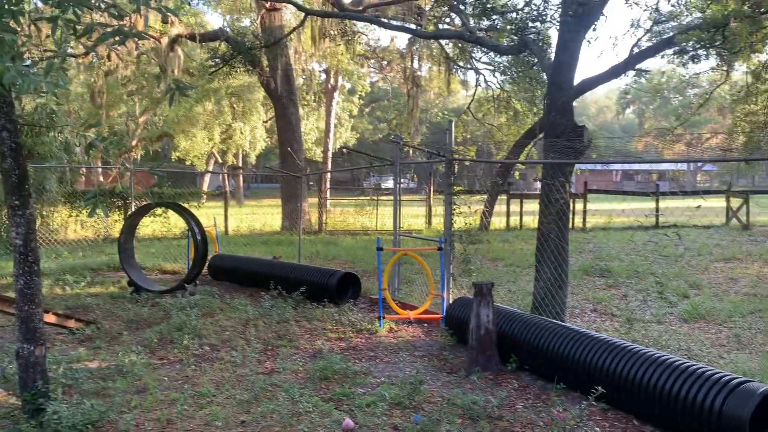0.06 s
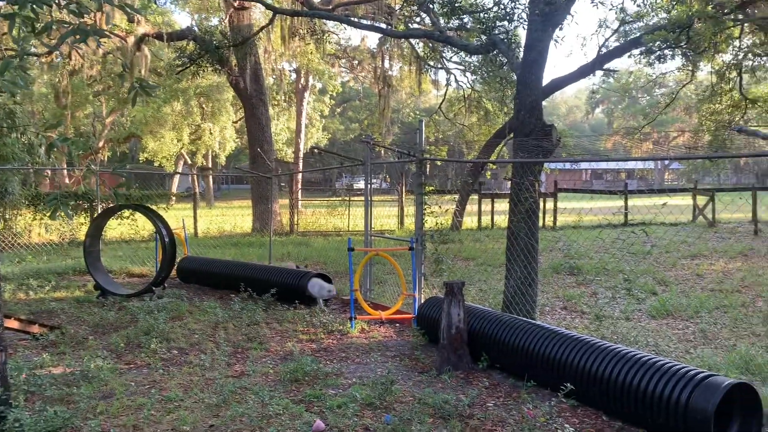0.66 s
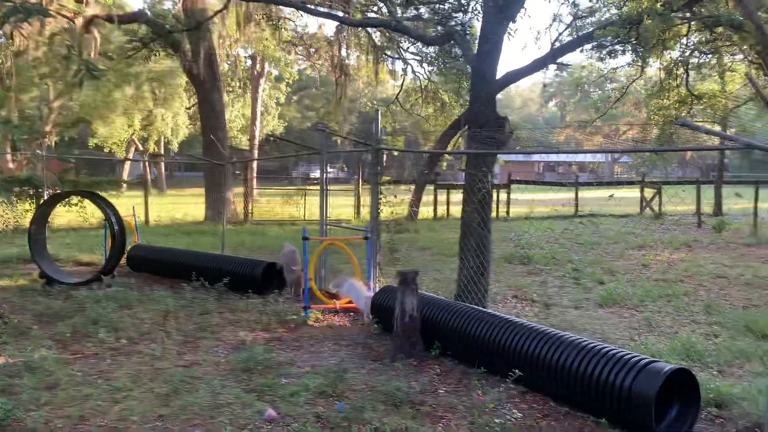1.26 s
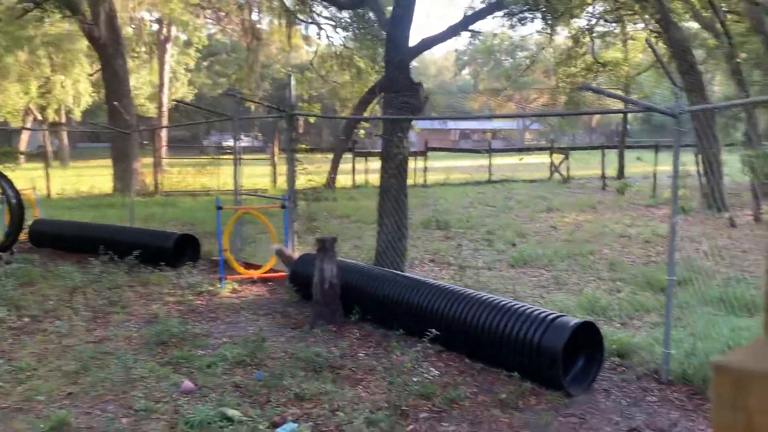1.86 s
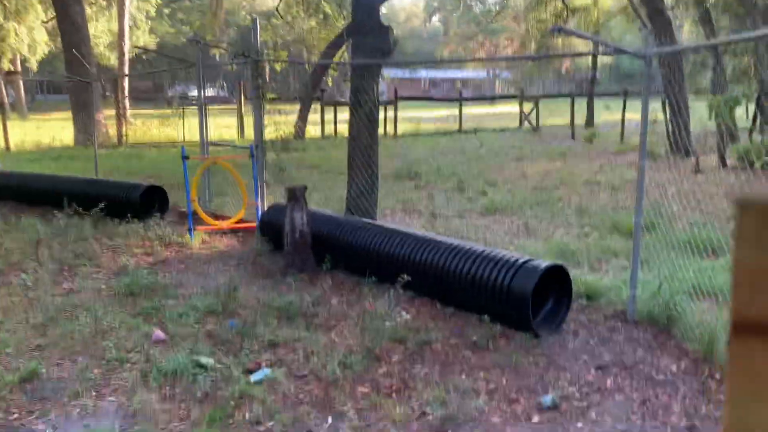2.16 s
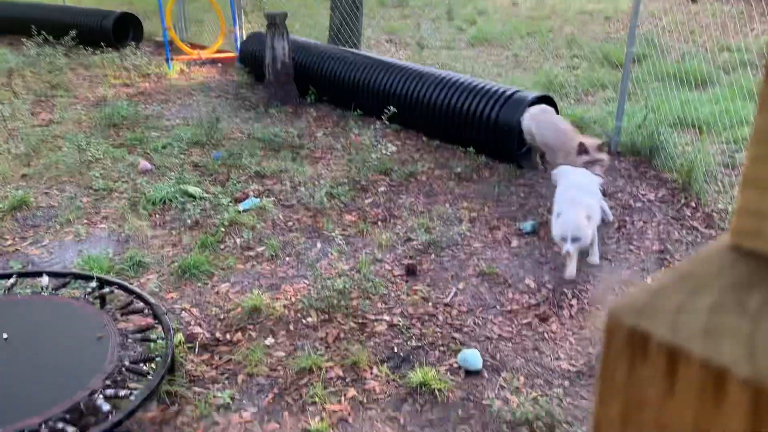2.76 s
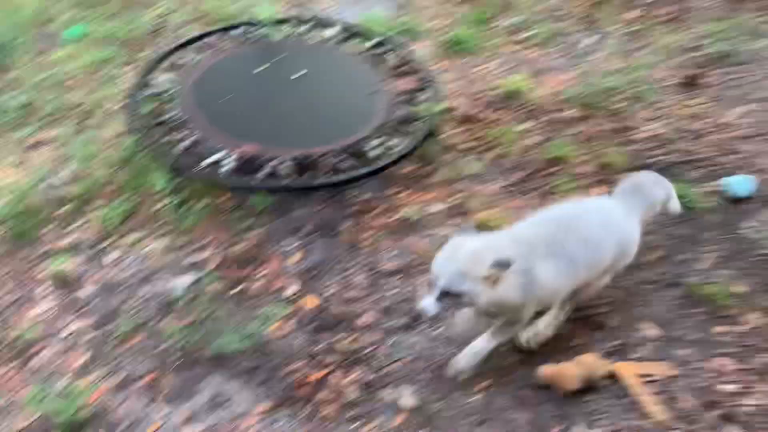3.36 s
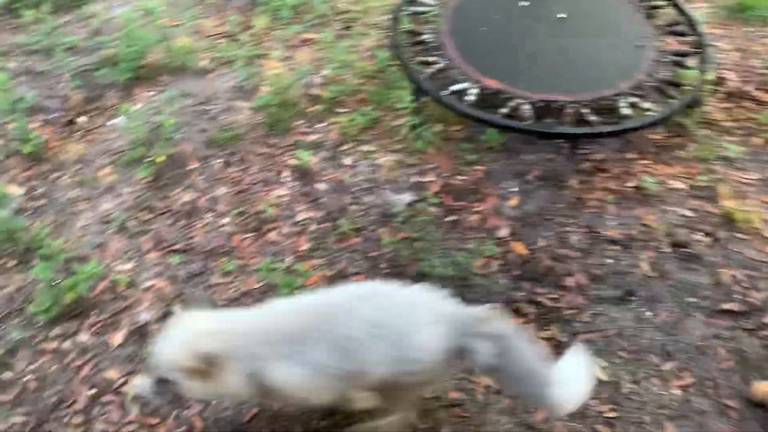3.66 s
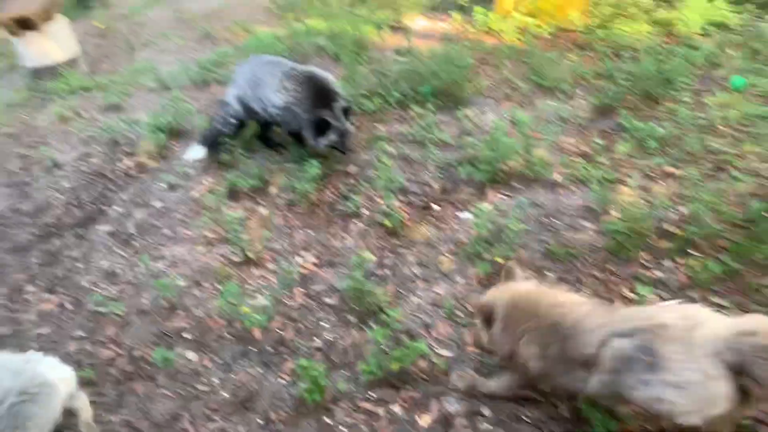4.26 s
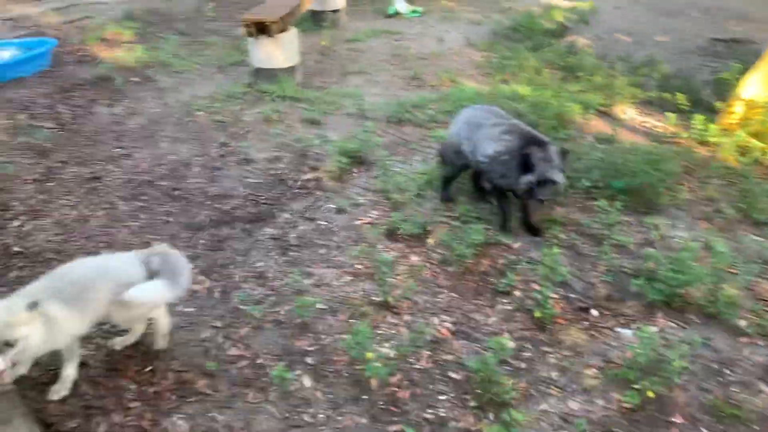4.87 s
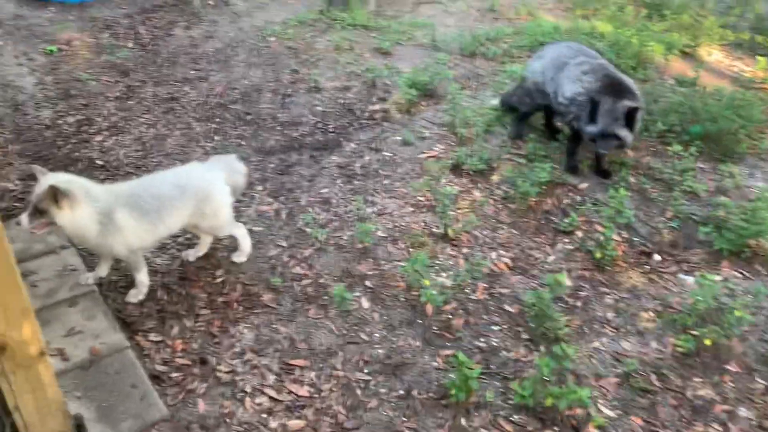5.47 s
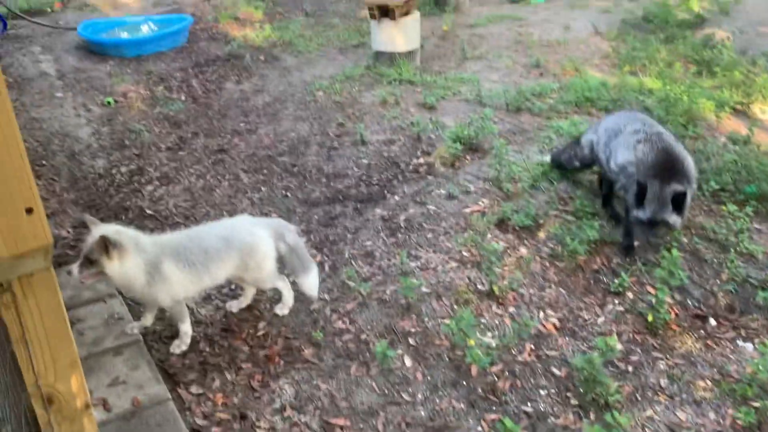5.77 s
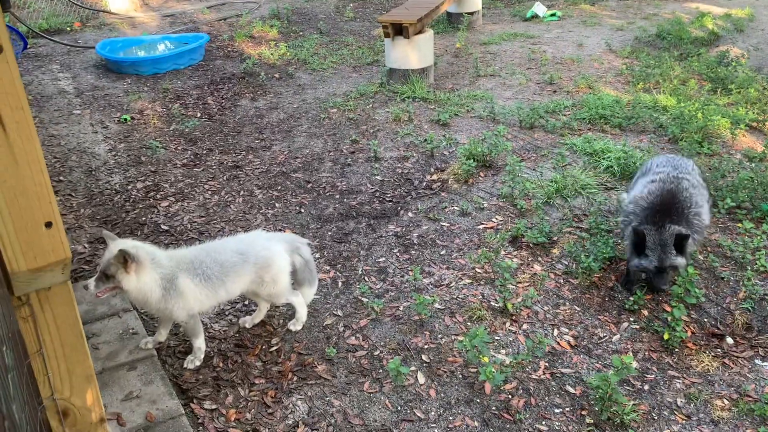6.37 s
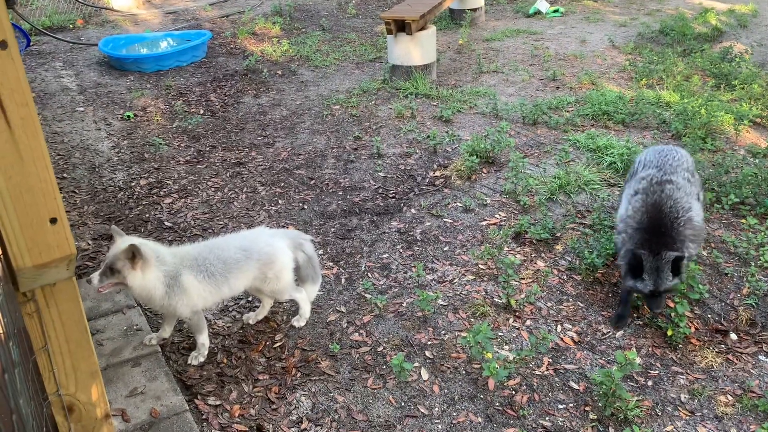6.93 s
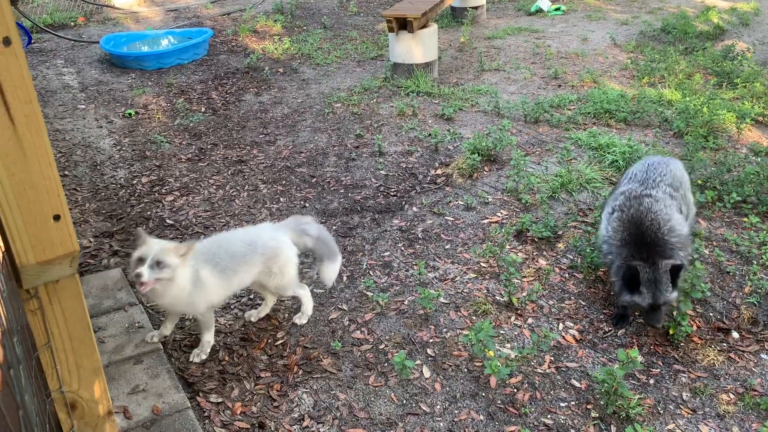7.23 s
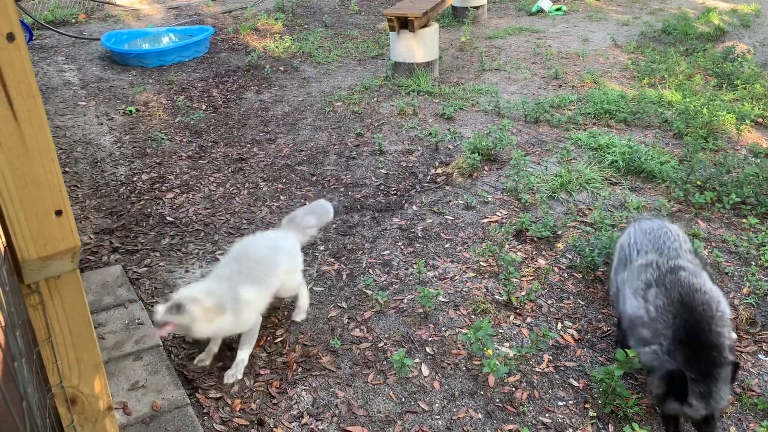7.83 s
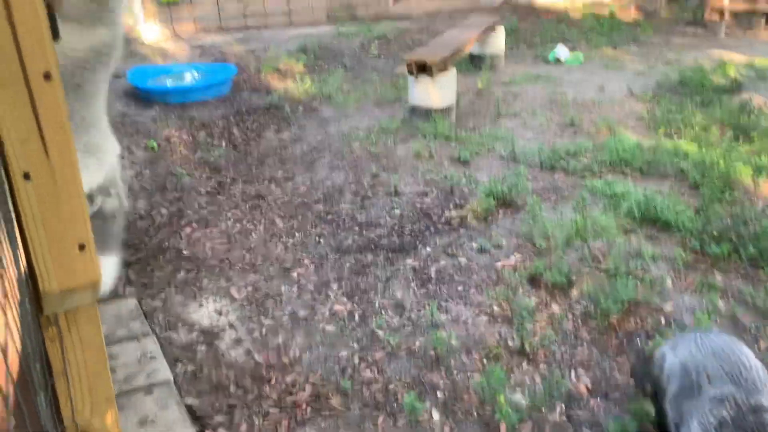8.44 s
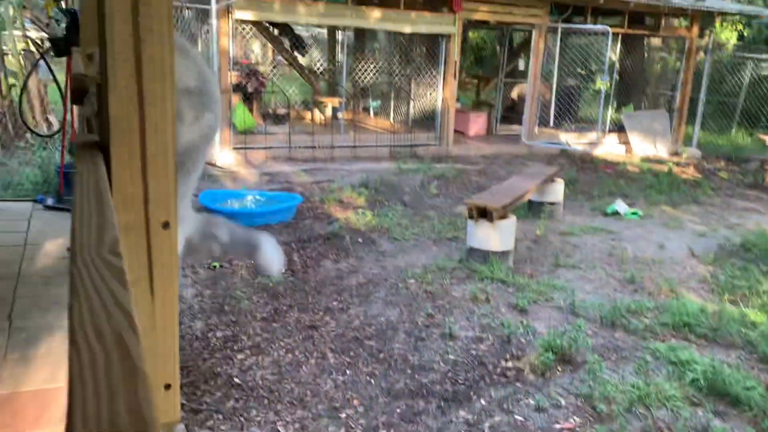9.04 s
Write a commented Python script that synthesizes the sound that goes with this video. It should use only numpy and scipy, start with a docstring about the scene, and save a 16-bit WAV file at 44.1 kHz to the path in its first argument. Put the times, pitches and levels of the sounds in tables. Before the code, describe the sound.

Foxes chatter in high chirps and whines while running closer through dry leaves, then one squeals loudly and scrambles onto a wooden deck.

```python
"""Over a low, distant rumble, two foxes run closer through a plastic pipe and dry leaves, chattering in
chirps and whines: vocal folds, clean or chaotic, driving throat resonances. A songbird repeats a phrase,
paws thud, some calls end in a huff, twigs snap. A fox yelps; a second bird whistles farther off.
One fox squeals loudly close by, then scrambles onto a wooden deck, whose boards ring.
Last, two hoarse calls come from the far pens."""
import sys
import numpy as np
from scipy import signal
from scipy.fft import rfft, irfft, next_fast_len
from scipy.io import wavfile
from scipy.ndimage import uniform_filter1d

SR = 44100
rng = np.random.default_rng(int(sys.argv[2]) if len(sys.argv) > 2 else 0)


def wav_record(signal):
    """Record a signal, one row per channel, as 16-bit PCM in the file named by sys.argv[1]."""
    frames = np.transpose(np.atleast_2d(signal))
    bounded = np.clip(frames, -1, 1)
    # unit amplitude maps onto the largest positive 16-bit level
    quanta = np.round(bounded * 32767).astype(np.int16)
    wavfile.write(sys.argv[1], SR, quanta)


N = 405719

# Table levels are relative. Echo decay: (frequency [Hz], T60 [s])
YARD_T60 = [(200, 0.99), (2200, 0.59), (14000, 0.036)]
# distant rumble: (frequency [Hz], level [dB])
RUMBLE_SPECTRUM = [(15, -57.5), (25, -18.5), (93, 0), (389, -27.5), (1570, -51), (2770, -47.5),
                   (15500, -72)]
# (time [s], level [dB])
RUMBLE_LEVEL = [(0, -45.5), (3, -45), (7.5, -52), (8.4, -45.5)]
# dry leaves: (frequency [Hz], level [dB])
LEAF_SPECTRUM = [(150, -10.5), (400, 4.5), (7000, -5), (15800, -7)]
# leaves underfoot: (time [s], level [dB])
RUNNING_LEVEL = [(0, -67.5), (2.2, -59.5), (3.8, -57.5), (4.3, -50), (4.8, -57), (5.1, -75.5), (6.3, -84),
                 (8.5, -67)]
# lower throat resonance: (frequency [Hz], level [dB])
THROAT_SPECTRUM = [(250, -39), (480, -20), (800, -1.5), (1100, 2.5), (1500, 5.5), (2300, -38.5)]
# shrill edge of near calls: (frequency [Hz], level [dB])
EDGE_SPECTRUM = [(2900, -25.5), (3700, -1), (4900, 7.5), (6000, 2), (7700, 15), (13000, -3), (15800, -17.5)]
# Brightness: upper throat resonance re lower. Edge: re upper. Push: place of peak effort in the call.
# chirps, barks: (time [s], length [s], first pitch [Hz], last pitch [Hz], settling [s], push [0-1],
#   effort [dB], brightness [dB], edge [dB], roughness [0-1])
CHIRPS = [(0.054, 0.15, 1380, 977, 0.026, 0, -44, 7, -11, 0.22),
          (0.269, 0.086, 1405, 937, 0.059, 0.21, -49.5, 10, -17, 0.63),
          (0.478, 0.12, 1023, 878, 0.048, 0.48, -50.5, 13, -13.5, 0.11),
          (1.273, 0.094, 827, 938, 0.011, 0.15, -46.5, 8, -11, 0.22),
          (1.44, 0.14, 1038, 917, 0.23, 0.11, -53, 19, -6, 0.03),
          (1.574, 0.13, 946, 915, 0.076, 0.12, -55, 21, -7, 0),
          (1.764, 0.15, 1375, 941, 0.043, 0.1, -46, 12, -15.5, 0.23),
          (2.003, 0.23, 1467, 1043, 0.04, 0, -40, 9.5, -10.5, 0.14),
          (2.302, 0.1, 1410, 1024, 0.042, 0.12, -43.5, 11.5, -13, 0.33),
          (2.494, 0.15, 1238, 1035, 0.041, 0.04, -37, 4, -2.5, 0.24),
          (2.709, 0.13, 1346, 971, .04, 0.08, -37.5, 5, -7.5, 0.35),
          (2.916, 0.12, 1227, 1008, 0.22, 0.36, -29.5, 5, -11, 0.15),
          (3.109, 0.077, 1378, 1299, 0.046, 0.62, -27, -8, -8, 0.43),
          (3.298, 0.13, 1080, 861, 0.038, 0.77, -33.5, 3, -7.5, 0.17),
          (3.559, 0.072, 1150, 819, 0.19, 0.29, -30.5, -5, -13, 0.82),
          (3.757, 0.081, 482, 693, 0.021, 0.69, -40.5, -0.5, -7.5, 0.42),
          (4.336, 0.13, 565, 703.7, 0.0089, 0.54, -33.5, -8.5, -9, 0.11),
          (4.929, 0.088, 827, 681, 0.05, 0.19, -45, 1.5, -9.5, 0.81)]
# foxes' position: (time [s], left port lead [ms], ground bounce delay [ms])
FOX_PATH = [(2.998, -0.21, 0.98), (3.9, 0.14, 0.93)]
# foxes' echo: (time [s], level [dB])
FOX_ECHO = [(2.2, -8), (3.1, -23.5), (4.7, -16.5)]
# songbird's phrase: (time from onset [s], pitch [Hz], level [dB])
PHRASE = [(0, 5270, -16), (.04, 4150, -3.5), (.075, 3312, -2), (.11, 3076, 10), (.14, 2600, 0),
          (.19, 2950, 2.5), (.22, 3650, 8), (0.279, 2478, 2.5), (.39, 2770, -2.5)]
# its repeats: (time [s], level [dB])
SONGS = [(0.371, -51), (3.059, -51.5), (6.878, -51.5)]
# paws on pipe and ground: (time [s], level [dB], ring [Hz])
PAW_THUDS = [(0.681, -35.5, 839), (2.128, -33, 270), (3.762, -34, 476), (4.348, -33.5, 275)]
# whines: (time [s], length [s], first pitch [Hz], top pitch [Hz], last pitch [Hz], place of top [0-1],
#   push [0-1], effort [dB], brightness [dB], edge [dB], roughness [0-1])
WHINES = [(0.817, 0.39, 865, 938.2, 900, .45, 0.73, -50, 10.4, -8, 0.021),
          (3.948, .265, 741, 1009, 888, 0.56, 0.85, -41, 4, -11, 0.17)]
# breath after calls: (time [s], level [dB])
HUFFS = [(1.183, -46), (1.678, -43.5), (3.015, -48), (3.41, -46.5), (4.733, -36.5)]
# twigs, leaves snapping: (time [s], level [dB])
SNAPS = [(2.0339, -18.5), (2.259, -25.5), (3.784, -27), (3.956, -32), (4.349, -32.5)]
# yelp: (time [s], pitch [Hz], effort [dB], brightness [dB], roughness [0-1])
YELP_CONTOUR = [(4.615, 493, -49.5, -2, 0.25), (4.648, 737, -50.5, 12.5, 0), (4.678, 1134, -38, 10.5, 0.02),
                (4.735, 966, -32, 6.5, 0.07), (4.75, 938, -30, -2, 0.12)]
# far bird: (time [s], length [s], pitch [Hz], level [dB])
WHISTLES = [(5.088, 0.12, 2740, -63.5), (5.756, 0.21, 2675, -64.5)]
# squeal: (time [s], pitch [Hz], effort [dB], brightness [dB], roughness [0-1])
SQUEAL_CONTOUR = [(7.333, 481.5, -49, -13.5, 0.94), (7.42, 918, -38, 2.5, 0.81),
                  (7.479, 1014, -37.5, 9.5, 0.09), (7.555, 1171, -33.5, 13, 0.08),
                  (7.598, 1169, -32.5, 20.5, 0.06), (7.632, 1172, -44, 27, 0.14),
                  (7.656, 1097, -35.5, 8.5, 0.04), (7.695, 1088, -32, 8.5, 0.01),
                  (7.757, 1078, -32, 3, 0.04), (7.783, 1041, -28, 5.5, 0), (7.817, 979, -26, -0.5, 0.02),
                  (7.831, 856.4, -30.5, 9, 0.14), (7.843, 963, -26.5, -1.5, 0.31)]
# its piercing edge: (frequency [Hz], level [dB])
SQUEAL_EDGE_SPECTRUM = [(3000, -36), (3500, 16), (4400, 9), (6500, -4.5), (7800, 5), (13000, -12),
                        (15800, -30.5)]
# scramble onto the deck: (time [s], length [s], level [dB])
SCUFFS = [(7.979, 0.62, -58.5), (8.425, 0.046, -45.5), (8.934, 0.098, -46)]
# brushed boards: (frequency [Hz], level [dB])
SCUFF_SPECTRUM = [(100, -28.5), (400, 1), (1900, -4.5), (12000, -29)]
# paws on the deck: (time [s], level [dB])
LANDINGS = [(8.35, -41.5), (8.693, -39), (8.76, -41.5), (8.962, -44)]
# ringing boards: (frequency [Hz], level [dB], T60 [s])
DECK_MODES = [(268, 5, 0.057), (497.4, -1.5, 0.19), (1081, -10, 0.32)]
# calls from the pens: (time [s], length [s], pitch [Hz], effort [dB], brightness [dB])
FAR_CALLS = [(8.502, 0.34, 497.4, -61.5, 21.5), (8.942, 0.24, 504.4, -65, 23)]
# their shrill edge: (frequency [Hz], level [dB])
FAR_EDGE_SPECTRUM = [(2600, -15), (3700, 14), (7200, -5), (15800, -46)]
# left microphone port re right: (frequency [Hz], phase [rad])
PORT_PHASE = [(4000, 0), (6500, .6), (9500, 3.1), (12200, 5.9), (14300, 6.5)]

CUTOFF_HZ, RING_HZ = 15850, 2642  # band limit; upper throat resonance of the chatter
FLUTTER_DB, SHIMMER_DB = 3.5, 2  # unsteadiness of level; of overtones
WAVER, WAVER_DB, WAVER_HZ = .01, 2.2, 28  # pitch share, brightness, top rate
DOUBLING, STRAIN_PER_DB = 3, .062  # sub-octave gain; breath share when overblown
HISS_HZ, EDGE_RASP = 5500, 1.5
HOLLOW_HZ, HOLLOW_WIDTH_HZ, HOLLOW_DB = 3970, 340, -6.5  # dip between throat and edge
SWELL_DB, FADE_DB = 14.5, 19.5  # effort slopes before and after the push, per call length
MOUTH_DB, MOUTH_LAG, TREBLE_HOLD = 3, .11, .45  # mouth is widest after the push; treble resists effort
PARTING_DB, PARTING_S = 9.5, .041  # treble held back until the jaws part
RELEASE_DB, RELEASE_S = 9.5, .013  # breath runs out
CLOSING_DB, SLUMP = 9.5, .06  # closing mouth: bass blooms, pitch drops by this share


def amp(db):
    """Decibels to gain."""
    return 10 ** (np.asarray(db) / 20)


def unit_rms(x):
    """Scales to rms 1."""
    return x / np.sqrt(np.mean(x ** 2) + 1e-20)


def steadied(x):
    """Holds the running rms near 1."""
    return x / np.sqrt(abs(uniform_filter1d(x ** 2, size=700)) + 1e-12)


def at_hz(points, hz):
    """Table lookup on a log-frequency axis."""
    f, value = np.transpose(points)
    return np.interp(np.log(hz + 1), np.log(f + 1), value)


def curve(points):
    """(time [s], value) at every sample."""
    return np.interp(np.arange(N) / SR, *np.transpose(points))


def shaped(x, gain):
    """Filters by gain(frequency)."""
    size = next_fast_len(x.shape[-1] + 1024)
    return irfft(rfft(x, size) * gain(np.fft.rfftfreq(size, 1 / SR)), size)[..., :x.shape[-1]]


def coloured(x, points):
    """Filters by (frequency [Hz], level [dB])."""
    return shaped(x, lambda f: amp(at_hz(points, f)))


def band_noise(count, centre_hz, half_width_hz):
    """Noise with one resonant peak."""
    return shaped(rng.standard_normal(count), lambda f: 1 / (1 + ((f - centre_hz) / half_width_hz) ** 2))


def wander(count, hz):
    """Random drift, rms 1, rolled off above hz."""
    return unit_rms(shaped(rng.standard_normal(count), lambda f: 1 / (1 + (f / hz) ** 4)))


def resonate(x, hz, width_hz):
    """Resonance tracking the curve hz."""
    phase = 2 * np.pi * np.cumsum(hz) / SR
    carrier = np.array([np.cos(phase), np.sin(phase)])
    return (carrier * shaped(carrier * x, lambda f: 1 / (1 + (2 * f / width_hz) ** 2))).sum(0)


def add(mix, start_s, sound):
    """Mixes sound in at start_s."""
    part = mix[..., max(round(start_s * SR), 0):][..., :sound.shape[-1]]
    part += sound[..., :part.shape[-1]]


def placed(x, lead_ms, ground_ms, shadow_db_per_ms=7, ground=.2, wall=1.0):
    """One port gets low partials earlier and louder; ground and wall bounces ripple the spectrum."""
    wall_s = .006 * rng.uniform(.6, 1.4, (2, 1))

    def ports(f):
        low = 1 / (1 + (f / 4500) ** 6)
        shadow = amp(shadow_db_per_ms * lead_ms * low / (1 + (f / 1800) ** 4))
        left = shadow * np.exp(1j * np.pi * f * low * lead_ms / 1000)
        off_ground = np.exp(-2j * np.pi * f * ground_ms / 1000)
        off_wall = np.exp(-2j * np.pi * f * wall_s)
        bounces = ground * off_ground + wall * (low * off_wall + (1 - low) * off_wall[0])
        return np.array([left, 1 / left]) * (1 + f / (f + 600) * bounces)
    return shaped(x, ports)


def yard_echo(x, early_db=6, early_s=.035):
    """Strong early scatter from deck and ground, then a thin tail from fences and trees."""
    t = np.arange(SR) / SR
    taps = rng.standard_normal((2, SR)) * (rng.random((2, SR)) < .08) * (t > .004)
    taps *= 1 + amp(early_db) * np.exp(-t / early_s)
    hz, frame_s, spectra = signal.stft(taps, SR, nperseg=256)
    decay = amp(-60 * frame_s / at_hz(YARD_T60, hz)[:, None])
    tail = signal.istft(spectra * decay, SR, nperseg=256)[1]
    return signal.fftconvolve(x[None], tail / np.linalg.norm(tail[0]), axes=1)[:, :N]


def rumble(gain_db=-2, spread_hz=600, hum_hz=88.4, hum_db=-54.5):
    """Distant rumble, near mono in the bass, with a wavering hum."""
    mid, side = rng.standard_normal((2, N))
    side = shaped(side, lambda f: .24 + .2 * f / (f + spread_hz) * f / (f + 150))
    noise = unit_rms(coloured(np.array([mid + side, mid - side]), RUMBLE_SPECTRUM))
    hum = np.sin(2 * np.pi * np.cumsum(hum_hz + 3 * wander(N, 6)) / SR) * amp(1.6 * wander(N, 4.5))
    return noise * amp(curve(RUMBLE_LEVEL) + gain_db) + amp(hum_db) * unit_rms(hum)


def leaves(clicks_per_s=1100, spread_db=3.5, clump_db=4.5, echo_db=-6):
    """Dry leaves crushed underfoot: tiny uneven crackles in random clumps."""
    crackle, t = np.zeros(N), np.arange(SR // 100) / SR
    for hz in np.geomspace(1500, 13000, num=5):
        hits = rng.random(N) < clicks_per_s / 5 / SR
        sizes = amp(spread_db * np.minimum(rng.exponential(1, N), np.pi))
        crush = band_noise(len(t), hz, hz / 2) * np.exp(-t / .0013)
        crackle += signal.oaconvolve(hits * sizes, crush)[:N]
    clumped = coloured(crackle, LEAF_SPECTRUM) * amp(clump_db * wander(N, 16))
    mono = unit_rms(clumped) * amp(curve(RUNNING_LEVEL))
    return mono + amp(echo_db) * yard_echo(mono)


def scamper(gain_db=-33, thud_hz=330, clump_db=4):
    """Soft patter of running feet."""
    patter = band_noise(N, thud_hz, half_width_hz=260) * amp(clump_db * wander(N, 25))
    return unit_rms(patter) * amp(curve(RUNNING_LEVEL) / 2 + gain_db)


def vocal_folds(phase, hz, rough, hoarse):
    """Overtones swell and fade singly; in a cracking voice, alternating cycles add a sub-octave."""
    tone = np.zeros(len(phase))
    for k in range(1, 19):
        shimmer = amp(SHIMMER_DB * (2 - 1 / k) * wander(len(phase), 41))
        tone += shimmer * np.cos(k * phase + rng.uniform(0, 2 * np.pi)) * (k * hz < CUTOFF_HZ)
    tone = unit_rms(tone)
    return unit_rms(tone + (rough * tone + DOUBLING * hoarse ** 4) * np.cos(phase / 2))


def fox_voice(contour, ring_hz, edge_db, edge_spectrum, catch, width_hz=1050, highpass_hz=1550, breath=0,
              release_share=.068, waver=WAVER, dull_db=6, jitter=.085, rasp=.55, strain_db=-19):
    """Vocal folds and breath drive two throat resonances and a shrill edge."""
    s, *columns = np.transpose(contour)
    rise_s, fall_s = .004, .012
    t = np.arange(s[0], s[-1] + fall_s, 1 / SR)
    hz, effort_db, bright_db, hoarse = (np.interp(t, s, c) for c in columns)
    # catch: extra roughness as the folds start and stop
    u = np.linspace(0, 1, len(t))
    starting, stopping = np.exp(-(u / .27) ** 4), np.exp(-((1 - u) / release_share) ** 2)
    rough = np.clip(hoarse + catch * (starting + stopping), 0, 1)
    # unsteady airflow moves pitch and brightness together
    flow = wander(len(t), WAVER_HZ)
    flow = waver * (flow - flow.mean()) * np.sqrt(2 * rough)
    phase = 2 * np.pi * np.cumsum(hz * (1 + flow + jitter * rough * wander(len(t), 220))) / SR
    folds = vocal_folds(phase, hz, rough, hoarse)
    # rough or overblown folds leak puffs of air
    puffs = unit_rms((1 + np.cos(phase)) * rng.standard_normal(len(t)))
    leak = np.clip(rasp * rough + STRAIN_PER_DB * np.maximum(effort_db + bright_db - strain_db, 0), 0, .9)
    drive = np.sqrt(1 - leak ** 2) * folds + leak * puffs
    hiss = shaped(puffs, lambda f: f ** 4 / (f ** 4 + HISS_HZ ** 4))
    lower = steadied(coloured(drive, THROAT_SPECTRUM))
    ringing = resonate(drive, ring_hz * (hz / np.median(hz)) ** .6, width_hz)  # partly tracks pitch
    upper = steadied(shaped(ringing, lambda f: 1 / (1 + (highpass_hz / (f + 1)) ** 8)))
    edge = steadied(coloured(drive + (breath + EDGE_RASP * rough) * hiss, edge_spectrum))
    edge *= amp(edge_db - dull_db * starting)
    treble = amp(bright_db + WAVER_DB * flow / WAVER) * (upper + edge)
    level_db = effort_db + FLUTTER_DB * rough * np.tanh(wander(len(t), 90))
    gate = np.clip((t - t[0]) / rise_s, 0, 1) * np.clip((t[-1] - t) / fall_s, 0, 1)
    call = gate * amp(level_db) * (lower + treble)
    return shaped(call, lambda f: amp(HOLLOW_DB * np.exp(-((f - HOLLOW_HZ) / HOLLOW_WIDTH_HZ) ** 2)))


def mouthed_call(start_s, length_s, hz, push, level_db, bright_db, edge_db, rough, catch):
    """Effort swells to a push and fades while the mouth opens and shuts."""
    u = np.linspace(0, 1, len(hz))
    t = u * length_s
    ending = np.exp((t - length_s) / RELEASE_S)
    effort_db = -SWELL_DB * np.maximum(push - u, 0) - FADE_DB * np.maximum(u - push, 0)
    effort_db -= RELEASE_DB * ending
    widest = np.clip(push + MOUTH_LAG, .05, .95)
    mouth = np.sin(np.interp(u, [0, widest, 1], [0, np.pi / 2, np.pi]))
    upper_db = bright_db + MOUTH_DB * (mouth - 1) - TREBLE_HOLD * effort_db
    upper_db -= PARTING_DB * np.exp(-t / PARTING_S)
    bloom_db = CLOSING_DB * ending
    contour = np.column_stack([start_s + t, hz * (1 - SLUMP * ending), level_db + effort_db + bloom_db,
                               upper_db - bloom_db, np.full(len(u), rough)])
    return start_s, fox_voice(contour, RING_HZ, edge_db, EDGE_SPECTRUM, catch)


def chirp(start_s, length_s, first_hz, last_hz, settle_s, *voice):
    """Pitch leaps out and settles, fast at first."""
    decay = np.exp(-np.linspace(0, length_s, num=40) / settle_s)
    hz = last_hz + (first_hz - last_hz) * (decay - decay[-1]) / (1 - decay[-1])
    return mouthed_call(start_s, length_s, hz, *voice, catch=.42)


def chatter():
    """Chirps, whines and the yelp, placed along the foxes' path."""
    direct, mono = np.zeros((2, N)), np.zeros(N)
    s, lead_ms, ground_ms = np.transpose(FOX_PATH)
    for start_s, call in [chirp(*row) for row in CHIRPS] + [whine(*row) for row in WHINES] + [yelp()]:
        add(direct, start_s, placed(call, np.interp(start_s, s, lead_ms), np.interp(start_s, s, ground_ms)))
        add(mono, start_s, call)
    return direct + yard_echo(mono * amp(curve(FOX_ECHO)))


def whistle(hz, warble):
    """Pure tone with a fast random warble."""
    return unit_rms(np.sin(2 * np.pi * np.cumsum(hz * (1 + warble * wander(len(hz), 130))) / SR))


def songbird(warble=.02, buzz=.13, buzz_s=.035):
    """Repeated whistled phrase, opening with an airy buzz."""
    mono = np.zeros(N)
    s, hz, level_db = np.transpose(PHRASE)
    t = np.arange(0, s[-1], 1 / SR)
    for start_s, db in SONGS:
        notes = whistle(np.interp(t, s, hz), warble + buzz * np.exp(-t / buzz_s))
        add(mono, start_s, amp(db + np.interp(t, s, level_db)) * notes * signal.windows.tukey(len(t), .1))
    return mono


def birds(direct_db=-7, echo_db=-3):
    """Both birds, smeared by the trees."""
    near, far = songbird(), far_bird()
    return amp(direct_db) * (near + far / 2) + amp(echo_db) * yard_echo(near + far)


def thuds_and_snaps(paw_db=-4, paw_s=.018, snap_db=-7, snap_s=.0023, echo_db=-9):
    """Paws thud on pipe and ground; twigs crack."""
    mono, t = np.zeros(N), np.arange(SR // 5) / SR
    for s, db, hz in PAW_THUDS:
        thud = steadied(band_noise(len(t), hz, half_width_hz=170))
        add(mono, s, amp(db + paw_db) * thud * np.exp(-t / paw_s) * (1 - np.exp(-t / .0004)))
    for s, db in SNAPS:
        crack = unit_rms(coloured(rng.standard_normal(len(t)), LEAF_SPECTRUM))
        add(mono, s, amp(db + snap_db) * crack * np.exp(-t / snap_s))
    return mono + amp(echo_db) * yard_echo(mono)


def whine(start_s, length_s, first_hz, top_hz, last_hz, top, *voice):
    """Pitch climbs smoothly, then droops ever faster."""
    u = np.linspace(0, 1, num=40)
    climb = np.sin(np.pi / 2 * np.interp(u, [0, top], [1, 0])) ** 2
    droop = np.interp(u, [top, 1], [0, 1]) ** 1.9
    hz = top_hz - (top_hz - first_hz) * climb - (top_hz - last_hz) * droop
    return mouthed_call(start_s, length_s, hz, *voice, catch=.18)


def huffs(length_s=.043, centre_hz=4300, width_hz=2800):
    """Remaining breath rasps out as the voice breaks off."""
    mono, count = np.zeros(N), round(length_s * SR)
    for s, db in HUFFS:
        rush = shaped(rng.standard_normal(count), lambda f: 1 / np.hypot(1, (f - centre_hz) / width_hz))
        rasp = unit_rms(rush * amp(FLUTTER_DB * wander(count, 220)))
        add(mono, s, amp(db) * rasp * signal.windows.tukey(count))
    return mono + yard_echo(mono * amp(curve(FOX_ECHO)))


def yelp(edge_db=-6.5):
    """Clear cry: scoops up, swells, snaps shut."""
    return YELP_CONTOUR[0][0], fox_voice(YELP_CONTOUR, RING_HZ, edge_db, EDGE_SPECTRUM, catch=0, dull_db=-5)


def far_bird(warble=.02, arch=.099):
    """Faint whistles, arched in pitch and level."""
    mono = np.zeros(N)
    for start_s, length_s, hz, db in WHISTLES:
        swell = np.sin(np.linspace(0, np.pi, round(length_s * SR)))
        add(mono, start_s, amp(db) * swell * whistle(hz * (1 + arch * (swell - .5)), warble))
    return mono


def squeal(ring_hz=1960, edge_db=-14, echo_db=-16):
    """Close squeal: hoarse, overblown at the top, then pure."""
    mono = np.zeros(N)
    call = fox_voice(SQUEAL_CONTOUR, ring_hz, edge_db, SQUEAL_EDGE_SPECTRUM, catch=.2,
                     breath=.38, release_share=.04, waver=.004, dull_db=-3.5)
    add(mono, SQUEAL_CONTOUR[0][0], call)
    return placed(mono, lead_ms=.07, ground_ms=.82, ground=0, wall=.68) + amp(echo_db) * yard_echo(mono)


def scuffs(grain_db=3):
    """Paws and fur brush the boards in grainy strokes."""
    mono = np.zeros(N)
    for start_s, length_s, db in SCUFFS:
        count = round(length_s * SR)
        rub = coloured(rng.standard_normal(count), SCUFF_SPECTRUM) * amp(grain_db * wander(count, 98))
        add(mono, start_s, amp(db) * unit_rms(rub) * signal.windows.tukey(count))
    return mono + yard_echo(mono) / 2


def deck(detune=.0217, attack_s=.0015):
    """Landing paws thump the boards and set them ringing."""
    mono, t = np.zeros(N), np.arange(SR // 2) / SR
    for s, db in LANDINGS:
        ring = sum(amp(mode_db - 60 * t / t60_s) * np.sin(2 * np.pi * hz * rng.normal(1, detune) * t)
                   for hz, mode_db, t60_s in DECK_MODES)
        add(mono, s, amp(db) * ring * (1 - np.exp(-t / attack_s)))
    return mono + yard_echo(mono) / 2


def far_fox(ring_hz=1330, edge_db=-4.5, rough=.2, swell_s=.06, swell_db=9,
            fade_db_per_s=51.5, sag_hz_per_s=630, direct_db=-4, echo_db=-5):
    """Raspy, nasal calls from the pens swell, sag and fade, half lost in echo."""
    mono = np.zeros(N)
    for start_s, length_s, hz, level_db, bright_db in FAR_CALLS:
        t = np.linspace(0, length_s, num=30)
        past_s = np.maximum(t - swell_s, 0)
        effort_db = level_db - swell_db * np.maximum(1 - t / swell_s, 0) - fade_db_per_s * past_s
        columns = np.broadcast_arrays(start_s + t, hz - sag_hz_per_s * past_s, effort_db, bright_db, rough)
        call = fox_voice(np.column_stack(columns), ring_hz, edge_db, FAR_EDGE_SPECTRUM, catch=.2,
                         width_hz=660, highpass_hz=1270)
        add(mono, start_s, call)
    return amp(direct_db) * placed(mono, lead_ms=.19, ground_ms=.51) + amp(echo_db) * yard_echo(mono)


def scene():
    """Stereo sum of the yard."""
    voices = chatter() + huffs() + squeal() + far_fox() + birds()
    return voices + thuds_and_snaps() + deck() + scuffs() + leaves() + scamper() + rumble()


def record(dry):
    """Treble phase shift between the microphone ports, then the band limit."""
    shifted = shaped(dry, lambda f: np.array([np.exp(1j * at_hz(PORT_PHASE, f)), np.ones(len(f))]))
    lowpass = signal.firwin(511, CUTOFF_HZ, window=("kaiser", 9), fs=SR)
    return signal.oaconvolve(shifted, lowpass[None], "same")


dry = scene()
out = record(dry)
wav_record(out)
```